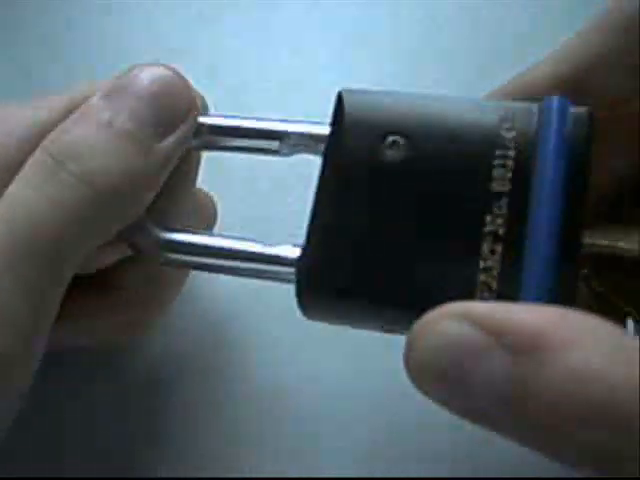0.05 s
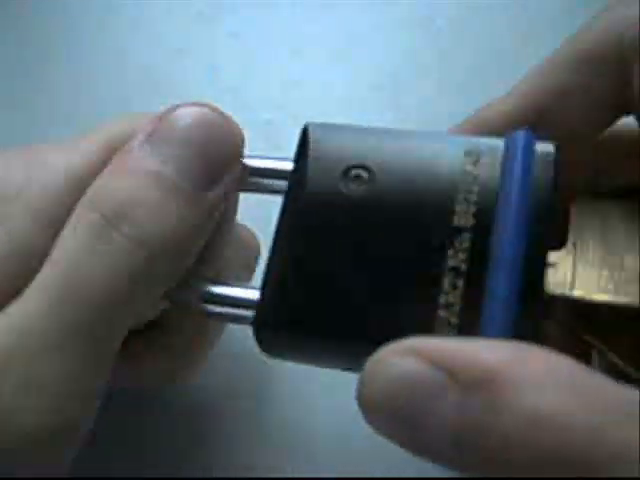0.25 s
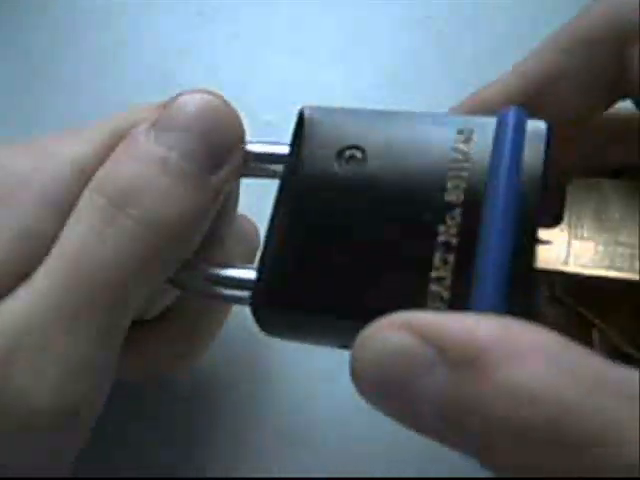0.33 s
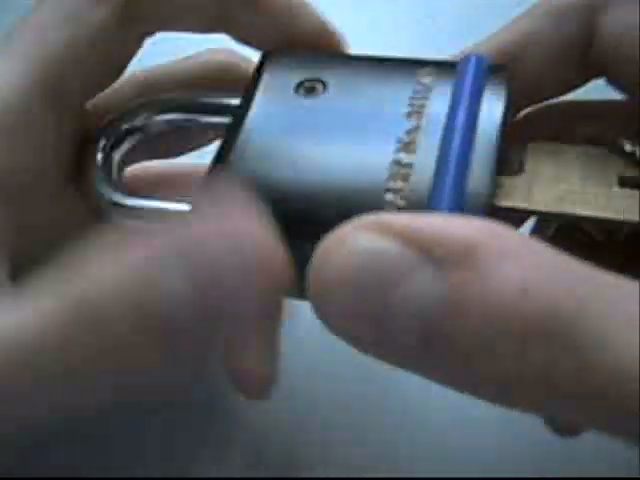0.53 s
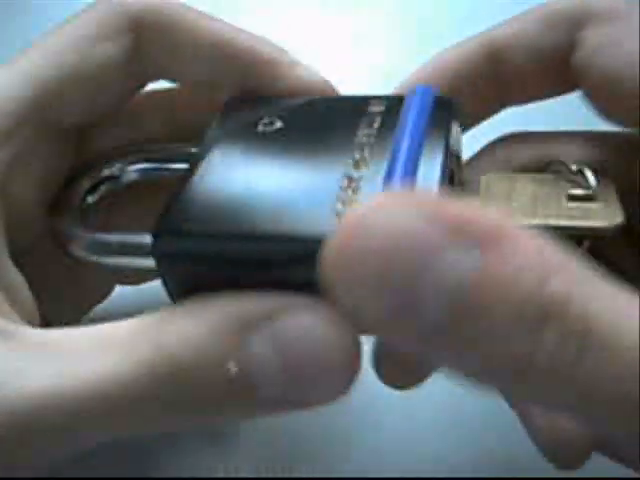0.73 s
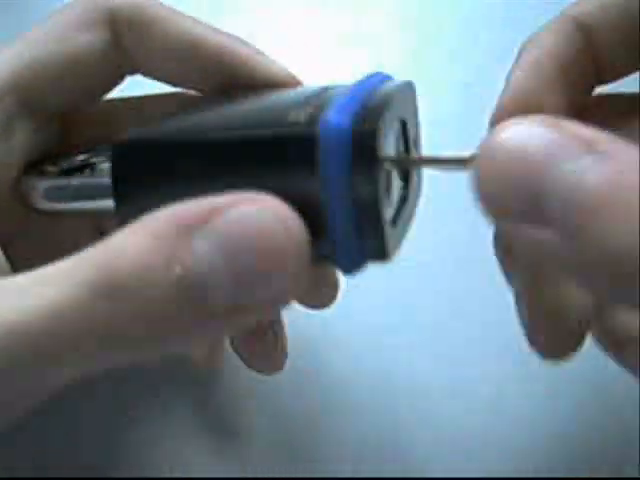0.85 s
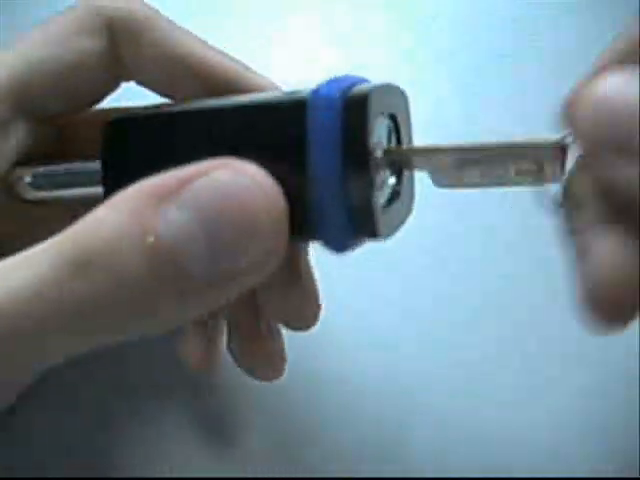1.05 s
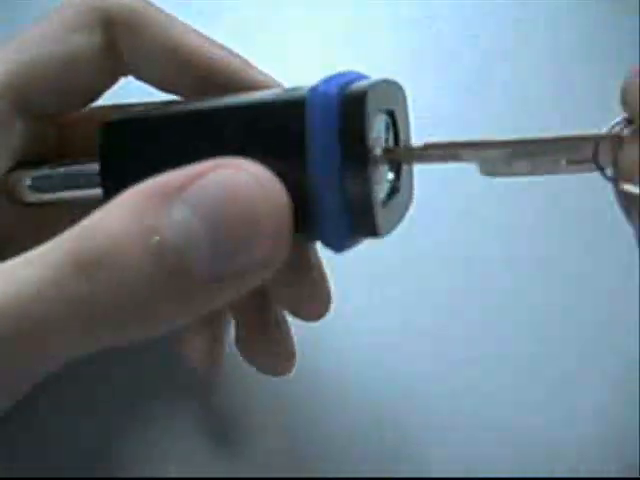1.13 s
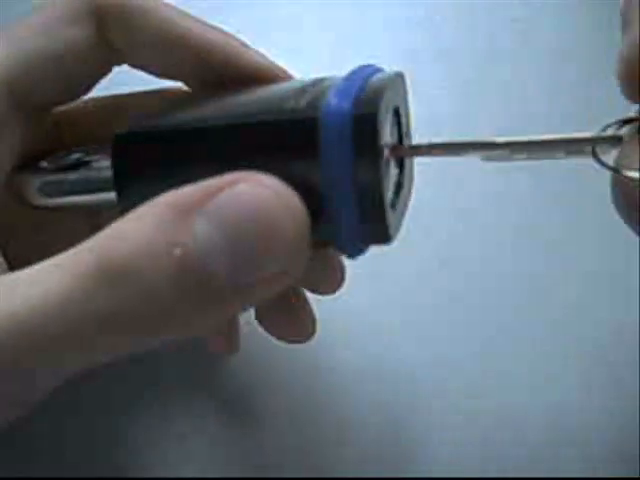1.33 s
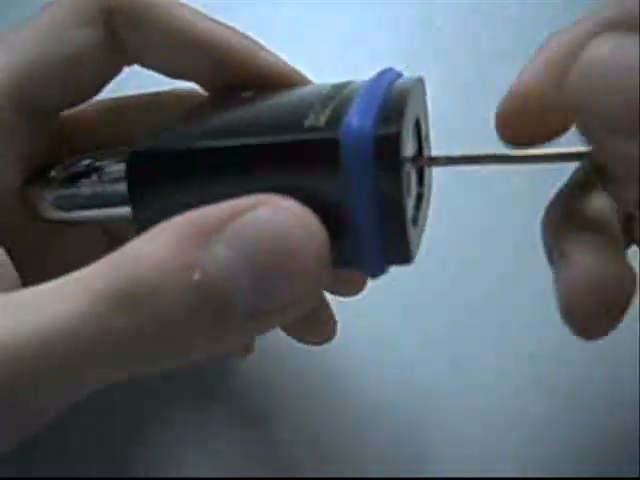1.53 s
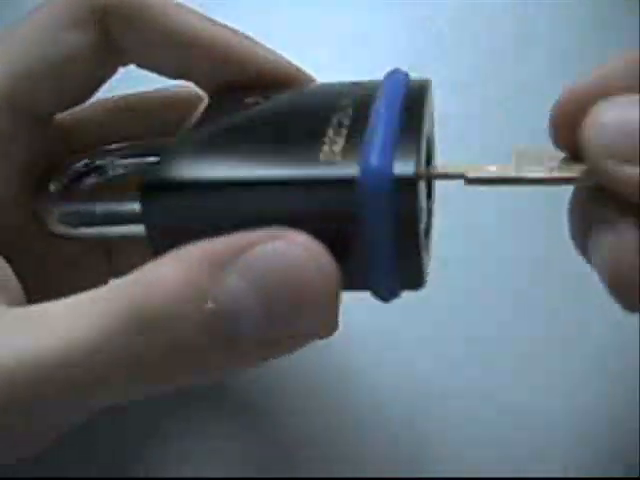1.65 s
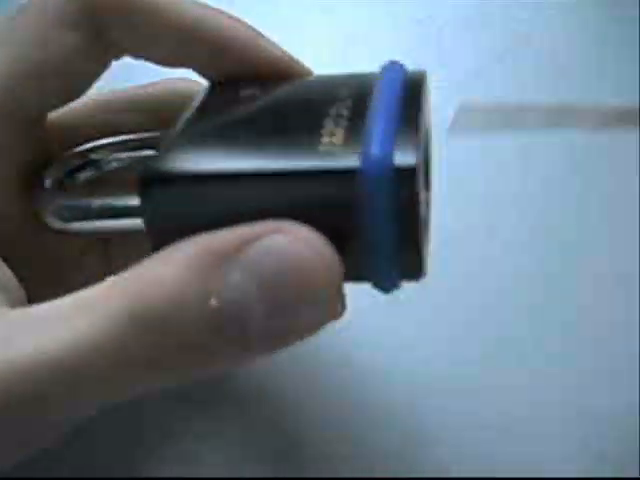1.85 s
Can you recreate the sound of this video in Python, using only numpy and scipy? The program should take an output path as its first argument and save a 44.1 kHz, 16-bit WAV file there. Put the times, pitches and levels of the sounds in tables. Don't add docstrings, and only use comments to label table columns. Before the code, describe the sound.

Sharp padlock click as the shackle locks home, brief rattle, then small key ticks, steady hiss

```python
import sys
import numpy as np
from scipy import signal
from scipy.fft import rfft, irfft
from scipy.io import wavfile
from scipy.ndimage import uniform_filter1d, map_coordinates

SR = 44100
rng = np.random.default_rng(int(sys.argv[2]) if len(sys.argv) > 2 else 0)


def decibels_to_gain(level_db):
    exponent = np.asarray(level_db, float) / 20
    return 10 ** exponent


def wav_out(sig):
    wavfile.write(sys.argv[1], SR, np.round(np.clip(np.atleast_2d(sig).T, -1, 1) * 32767).astype(np.int16))


N = 83790
HOLD_HZ = 8000


# (frequency [Hz], level [dB per Hz])
HISS_COLOUR = [(20, 8), (60, 0.5), (150, 2), (500, 3.5), (1200, 2), (2200, 1), (3500, 1), (4000, 0.5)]


def hiss():
    level_db, flicker_db, flicker_samples = -55.5, .35, 2000
    hz, db = np.array(HISS_COLOUR).T
    f = np.arange(N // 2 + 1) * SR / N + 1
    colour = decibels_to_gain(np.interp(np.log(f), np.log(hz), db)) * (f < HOLD_HZ / 2)
    noise = irfft(rfft(rng.standard_normal(N)) * colour, N)
    steps = np.repeat(rng.standard_normal(N // flicker_samples + 1), flicker_samples)[:N]
    flicker = uniform_filter1d(steps, size=flicker_samples)
    return noise / noise.std() * decibels_to_gain(level_db + flicker_db * flicker)


def room(x):
    level_db, t60_s = -21, .25
    t = np.arange(SR // 2) / SR
    tail = rng.standard_normal(len(t)) * decibels_to_gain(-60 * t / t60_s)
    tail = tail * (t > .004)
    tail = tail / np.sqrt(np.sum(tail ** 2))
    return decibels_to_gain(level_db) * signal.fftconvolve(x, tail)[:N]


def ring(x, hz, t60):
    pole = np.exp(2j * np.pi * hz / SR - np.log(1000) / (max(t60, .002) * SR))
    return signal.lfilter([1], [1, -pole], x).imag


def modes(x, table):
    return sum(decibels_to_gain(db) * ring(x, hz, t60) for hz, db, t60 in table)


# (time [s], level [dB])
KNOCK_TIMES = [
    (.2262, -44),
    (0.307, -29),
    (1.135, -36.5),
]


def knocks():
    hz, t60_s = 239, 0.004
    push = np.zeros(N)
    for s, db in KNOCK_TIMES:
        push[int(s * SR)] = -decibels_to_gain(db)
    return ring(push, hz, t60_s) + ring(push, hz / 3, 2 * t60_s)


# (frequency [Hz], level [dB], t60 [s])
BODY_MODES = [(2830, -28, .02), (3100, -26, .04), (3160, -25, .03), (3280, -29, .04), (3660, -21, .03),
              (3830, -27, .03)]
# (frequency [Hz], level [dB], t60 [s])
THUD_MODES = [(417, -34, 0.012), (1008, -12.5, 0.014), (1243, -4, 0.011), (1467, -4.5, 0.016),
              (1600, -12, 0.012)]


def metal(push, hz, t60, body, thud, thud_db):
    above_hz, below_hz, crack_db = 2250, 1950, -3
    t60 = max(t60, .002)
    swell = ring(ring(push, hz, t60), hz, t60) * 2 * np.e * np.log(1000) / (t60 * SR)
    highpass = signal.butter(4, above_hz, "high", fs=SR, output="sos")
    lowpass = signal.butter(4, below_hz, fs=SR, output="sos")
    high = signal.sosfilt(highpass, swell + modes(push, body))
    low = signal.sosfilt(lowpass, modes(push, thud))
    crack = decibels_to_gain(crack_db) * push
    return high + decibels_to_gain(thud_db) * (low + crack)


def rattle(curve, hz, t60, body_db):
    grains_per_s, spread_db, thud_db = 6000, 2.5, -10
    chance, sign, size = rng.random((3, N))
    s, db = np.array(curve).T
    grains = (chance < grains_per_s / SR) * np.sign(sign - .5)
    grains = grains * decibels_to_gain(-spread_db * np.log(size + 1e-9))
    pressure_db = np.interp(np.arange(N) / SR, s, db - 15.5, left=-120, right=-120)
    body = [(f, d + body_db, t) for f, d, t in BODY_MODES]
    return metal(grains * decibels_to_gain(pressure_db), hz, t60, body, THUD_MODES, thud_db)


# (time [s], level [dB])
SETTLE_LEVEL = [
    (.316, -58),
    (.319, -29),
    (.340, -33),
    (.367, -34.5),
    (.372, -40.5),
    (.435, -53.5),
    (.450, -46),
    (.470, -45),
    (.495, -73),
]


def settle():
    return rattle(SETTLE_LEVEL, hz=3600, t60=.0022, body_db=8)


# (time [s], level [dB])
SLIDE_LEVEL = [
    (.221, -85),
    (.229, -34),
    (.240, -41.5),
    (.255, -40),
    (.270, -36.5),
    (.292, -42),
    (.303, -34),
    (.309, -30),
    (.312, -70),
]


def slide():
    return rattle(SLIDE_LEVEL, hz=3590, t60=.008, body_db=5)


def hits(table, t60, scrape_db):
    length, scrape_length, scrape_fade_s = 4096, 512, .0015
    out = np.zeros(N + length)
    fade = np.exp(-np.arange(scrape_length) / SR / scrape_fade_s)
    chance = rng.standard_normal((len(table), 12))
    for (s, db, hz, thud_db), c in zip(table, chance):
        push = np.zeros(length)
        push[:scrape_length] = decibels_to_gain(db + scrape_db) * rng.standard_normal(scrape_length) * fade
        push[0] = decibels_to_gain(db)
        body = [(f * (1 + .006 * a), d + 3 * b, t) for (f, d, t), a, b in zip(BODY_MODES, c, c[6:])]
        thud = [(f * (1 + .02 * a), d + 2 * b, t) for (f, d, t), a, b in zip(THUD_MODES, c[6:], c)]
        i = int(s * SR)
        out[i:i + length] += metal(push, hz, t60, body, thud, thud_db)
    return out[:N]


# (time [s], peak level [dB], ring [Hz], thud level [dB])
KEY_TICKS = [(0.5134, -64, 3300, -2), (0.607, -49, 3600, -14), (0.782, -45, 3320, -9),
             (1.052, -56, 3260, -6), (1.1305, -37.5, 3520, -15), (1.1365, -40, 3300, -0.5),
             (1.1408, -41.5, 3580, -18), (1.1636, -37, 3250, -4.5), (1.1683, -38, 2960, -27),
             (1.1748, -43.5, 3700, -23), (1.2413, -37, 3480, -13), (1.265, -43, 3640, -17),
             (1.3384, -45, 2630, 0), (1.4672, -41, 3200, -7), (1.6223, -39.5, 2890, -32),
             (1.6886, -41.5, 3320, -5), (1.7003, -45.5, 3450, 2), (1.8711, -48, 2940, -10),
             (1.8844, -39, 2790, -19)]


def key_ticks():
    return decibels_to_gain(-4.5) * hits(KEY_TICKS, t60=.0045, scrape_db=-18)


# (time [s], peak level [dB], ring [Hz], thud level [dB])
LATCH_BLOWS = [(.22525, -31, 3570, -18), (.22637, -27, 3570, -14), (.22721, -27, 3570, -24),
               (.22749, -28, 3570, -24), (.2266, -38, 2300, 0), (.2305, -37, 3500, -16),
               (.2636, -33, 3420, -5), (.2803, -33, 2700, -10), (.2813, -30, 3400, -16),
               (.2846, -35, 3500, -10), (.2888, -34, 3500, -14), (.2987, -38, 3500, -10),
               (.3077, -15, 3760, -10), (.3093, -24, 3660, -10), (.30985, -19, 3660, -14),
               (.3127, -13, 3660, -22), (.3136, -16, 3200, -20), (.3151, -14, 3150, -11),
               (.3166, -18, 3750, -18), (.3182, -22, 3200, -12), (.3197, -26, 3200, -6),
               (.3216, -25, 3670, -14), (.3228, -26, 3670, -16), (.3246, -30, 3300, -12),
               (.3266, -26, 3200, -14), (.3356, -30, 3270, -12), (.4441, -31, 3460, -13),
               (.44555, -34, 3460, -10), (.4476, -42, 3460, -14), (.4490, -45, 3460, -8)]


def latch_blows():
    return decibels_to_gain(1.5) * hits(LATCH_BLOWS, t60=.0042, scrape_db=-34)


def scene():
    lock = knocks() + settle() + slide() + key_ticks() + latch_blows()
    antialias = signal.butter(8, 4400, fs=SR, output="sos")
    lock = signal.sosfiltfilt(antialias, lock + room(lock))
    return (hiss() + lock)[None]


def band_limit(x):
    return signal.sosfilt(signal.butter(12, 17200, fs=SR, output="sos"), x)


def record(dry):
    slip_values, slip_every_s, first_slip_s = .35, .25, .2
    top_hz, offset = 15500, -0.0027
    t = np.arange(N) / SR
    slip = slip_values * np.ceil((t - first_slip_s) / slip_every_s)
    taken = (np.floor(t * HOLD_HZ + slip) + .5 - slip) * SR / HOLD_HZ
    held = map_coordinates(dry[0], [taken], mode="mirror")[None]
    top_cut = signal.ellip(8, .1, 40, top_hz, fs=SR, output="sos")
    mix = signal.sosfiltfilt(top_cut, held) + offset
    return band_limit(mix)


dry = scene()
out = record(dry)
wav_out(out)
```